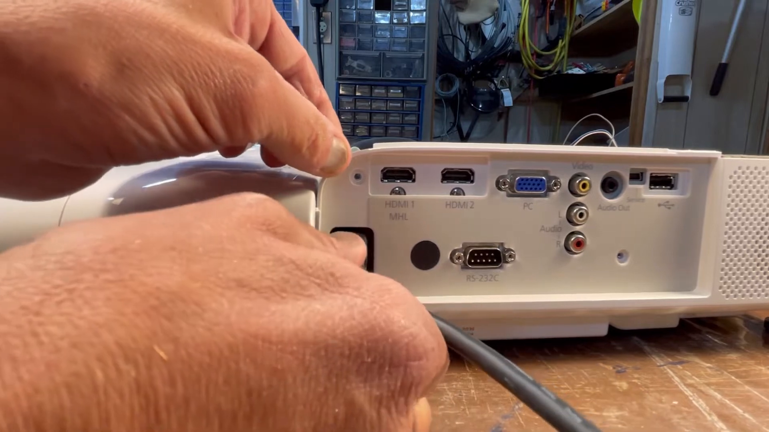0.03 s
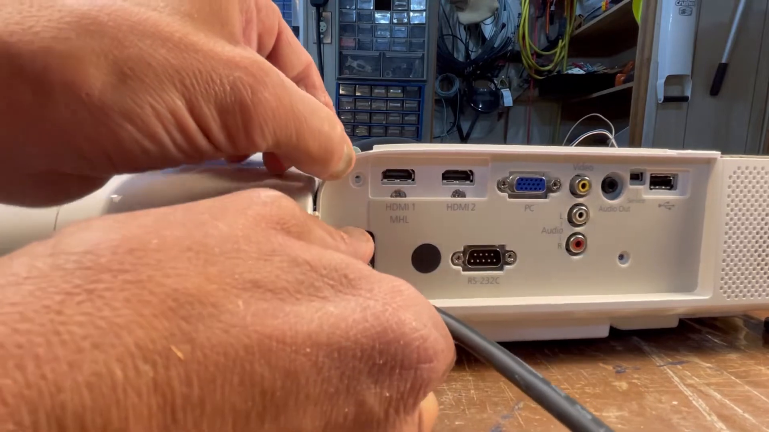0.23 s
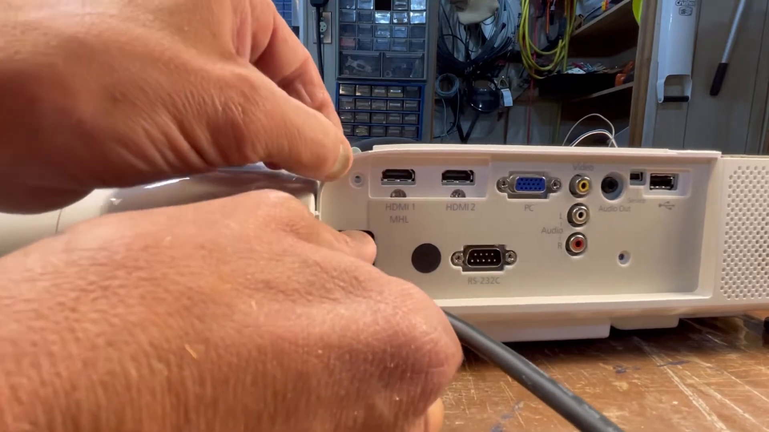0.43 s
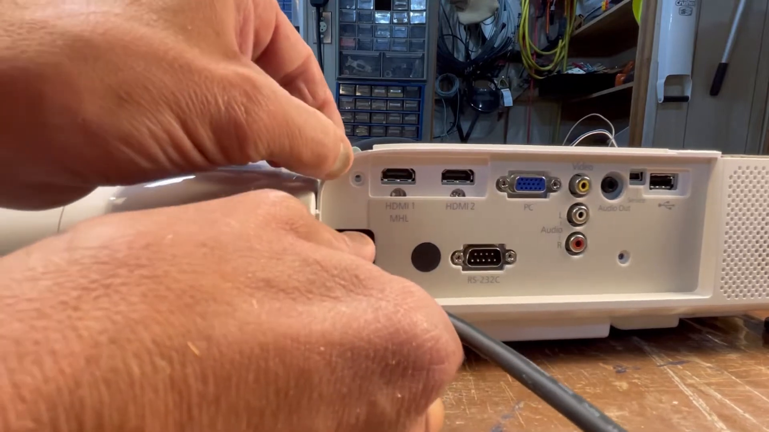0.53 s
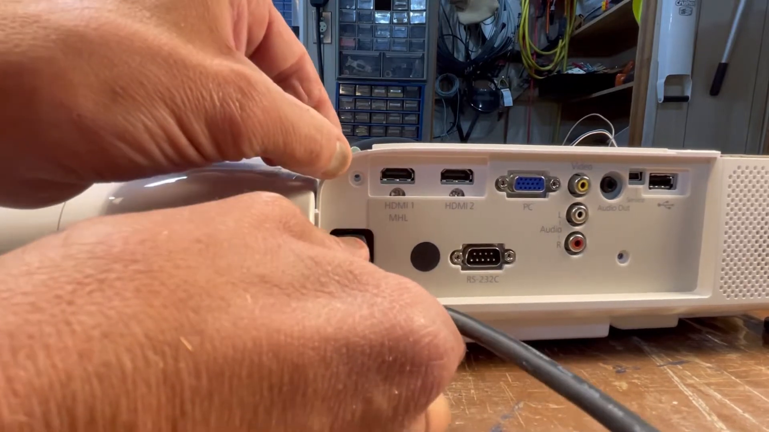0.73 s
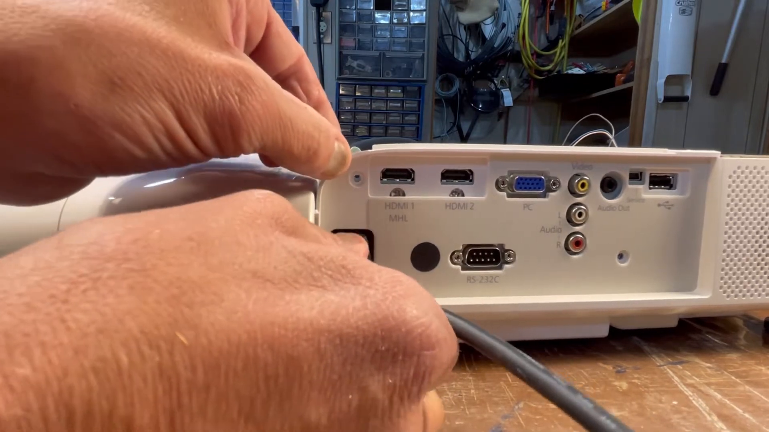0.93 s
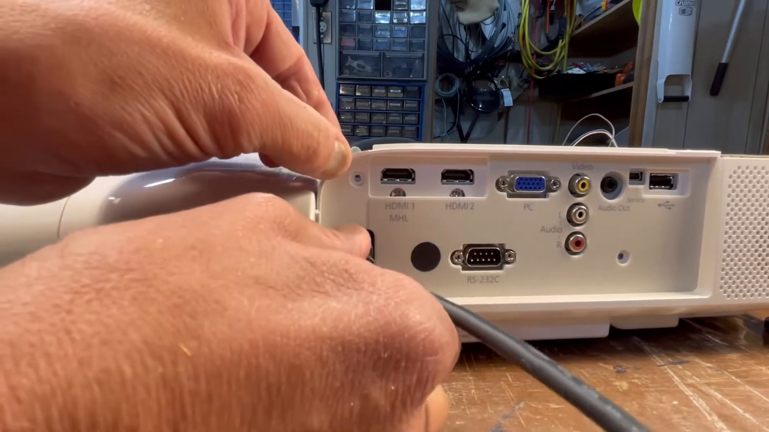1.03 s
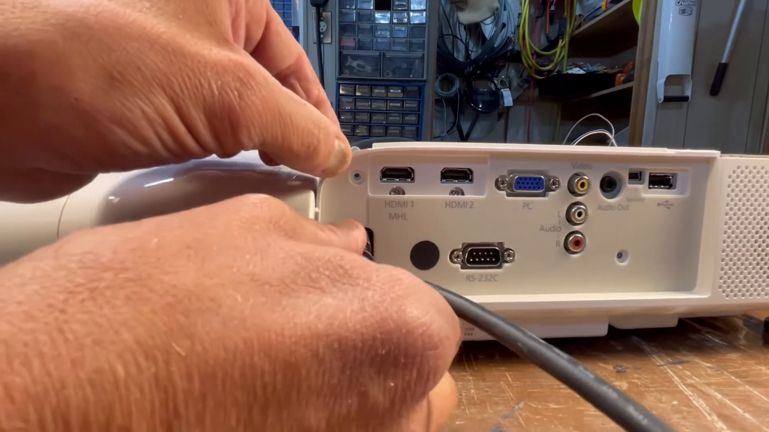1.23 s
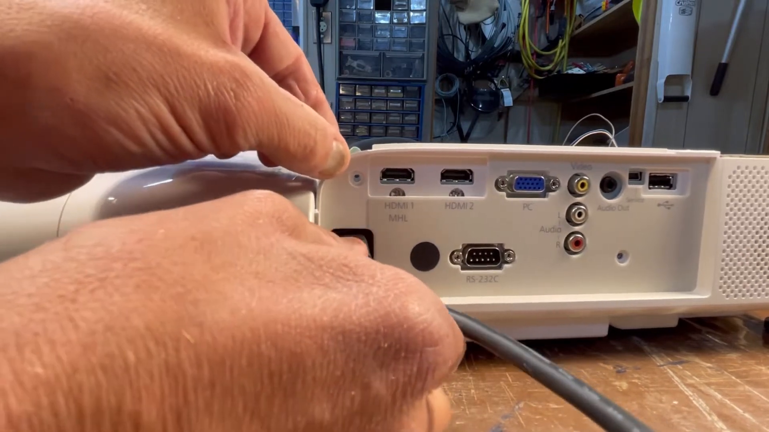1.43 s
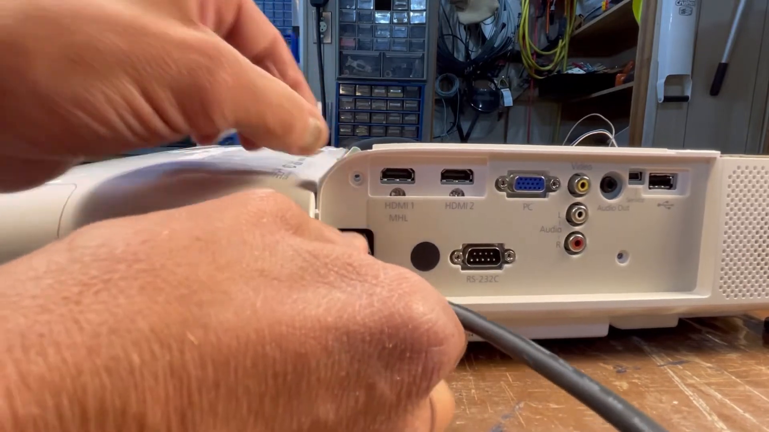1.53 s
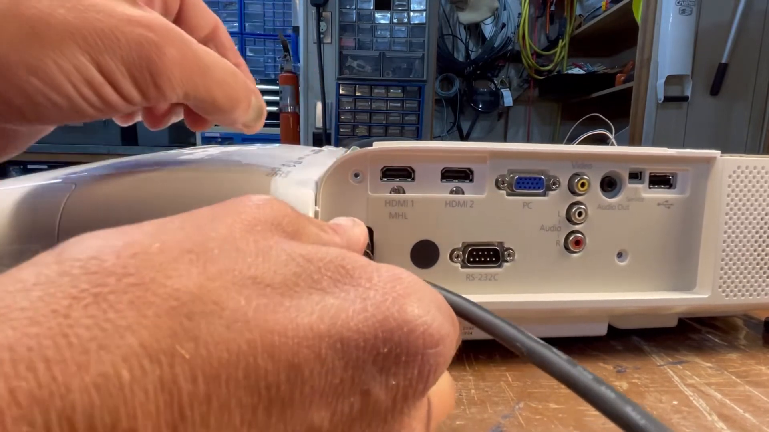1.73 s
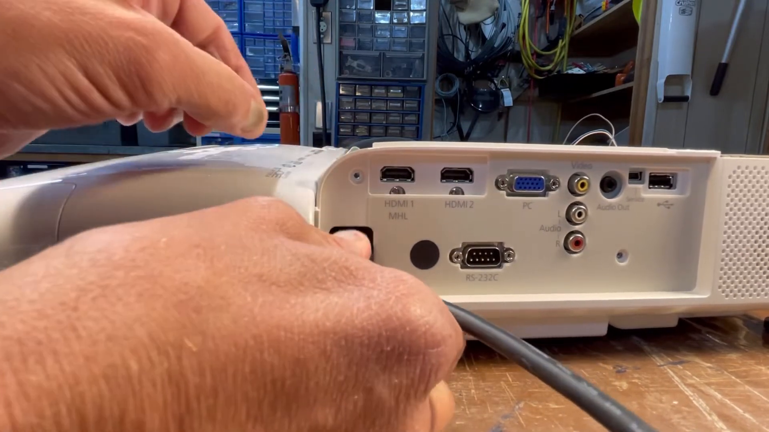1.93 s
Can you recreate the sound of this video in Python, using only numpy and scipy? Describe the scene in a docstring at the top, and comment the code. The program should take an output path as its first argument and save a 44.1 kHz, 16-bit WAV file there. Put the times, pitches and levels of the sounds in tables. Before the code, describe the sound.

A power plug snaps into a hollow plastic projector with one loud, sharp click, then hands wiggle it with faint creaks, rubs and small knocks on a wooden workshop bench; close stereo microphones, light room echo.

```python
"""One sharp click, with smaller knocks, ticks, rubs and faint whistles: a power plug is worked into the
socket of a hollow plastic case on a wooden bench in a workshop, and hands wiggle it after it snaps home.
Knocks are short chatters that ring the modes of case and bench; random grains make the creaks, rubs and
rumble; shaped noise makes squeak and air. The room answers; two spaced microphones listen from close by."""
import sys
import numpy as np
from scipy import signal
from scipy.fft import rfft, irfft
from scipy.io import wavfile
from scipy.ndimage import uniform_filter1d

SR = 44100
rng = np.random.default_rng(int(sys.argv[2]) if len(sys.argv) > 2 else 0)


def dump(signal):
    """Clip the signal to [-1, 1] and save it as 16-bit WAV at the path in sys.argv[1]."""
    limited = np.clip(np.atleast_2d(signal).T, -1, 1)
    pcm = np.round(limited * 32767).astype(np.int16)
    wavfile.write(sys.argv[1], SR, pcm)


def volts_from_db(level):
    """Convert decibel levels to linear amplitude ratios."""
    exponent = np.asarray(level, float) / 20
    return 10 ** exponent


N = 88200   # samples: two seconds

# Every knock of plug on socket; each path adds its own gain to its level:
# (time [s], case ring level [dB], pitch centre [Hz], bright tick level [dB], bench thump level [dB],
#  contact length before limiting [s])
KNOCKS = [(0.2089, -46, 680, -72.5, -72, 0.0022), (0.234, -11, 640, -21, -39.5, 0.0041),
          (0.236, -12.5, 820, -18, -22, 0.0016), (0.24, -11, 1300, -29.5, -37, 0.0035),
          (0.249, -19.5, 700, -39, -36.5, 0.006), (0.323, -35, 450, -62, -40.5, 0.0072),
          (0.48, -39, 780, -55, -45.5, 0.0013), (0.484, -38, 493.6, -54, -41, 0.0042),
          (0.542, -44.5, 995, -83, -55, 0.0021), (0.639, -43, 1071, -61.5, -59, 0.0032),
          (0.658, -50, 1150, -80, -65, 0.0034), (0.675, -50.5, 1130, -76, -62, 0.0047),
          (0.744, -51.5, 999, -84, -59, 0.0029), (0.986, -49, 625, -87, -58.5, 0.0019),
          (1.046, -56.5, 652, -67.5, -60, 0.0054), (1.052, -38.5, 762, -81, -51.5, 0.009),
          (1.0844, -33, 592.6, -70, -61.5, 0.0026), (1.112, -42.5, 960, -60.5, -46.5, 0.0036),
          (1.124, -45, 584, -56, -49.5, 0.0023), (1.136, -39, 900, -64, -75, 0.0023),
          (1.143, -36.5, 1328, -59, -60, 0.00052), (1.311, -57, 460, -65.5, -60.5, 0.0022),
          (1.346, -68, 1276, -84, -67, 0.0024), (1.372, -60.5, 1253, -75.5, -70.5, 0.0024),
          (1.501, -38, 781, -54, -60.5, 0.0028), (1.513, -43.5, 624, -82, -59, 0.0046),
          (1.546, -50.5, 1150, -67.5, -55.5, 0.0082), (1.573, -43, 657, -89, -81, 0.0062),
          (1.597, -35, 1845, -67, -55.5, 0.0039), (1.6061, -24.5, 1010, -45.5, -51, 0.0021),
          (1.613, -32.5, 1320, -64, -58, 0.00193), (1.623, -36.5, 990, -81, -56, 0.0025),
          (1.64, -27.5, 1300, -45, -50.5, 0.00064), (1.781, -44, 506, -90, -55.5, 0.0061),
          (1.848, -62, 516, -73, -71, 0.0048), (1.957, -51.5, 569, -68, -74.5, 0.0057),
          (1.978, -46, 747, -73, -64.5, 0.0024)]
# Hands working the plug, one list per stretch of time:
# (time [s], creak level in the case [dB], rumble level in the bench [dB])
HANDS = [
    [(0, -71.5, -76), (.04, -82.5, -69.5), (.172, -85, -80), (.19, -68.5, -66), (.215, -58.5, -67),
     (.233, -34.5, -35)],
    [(.28, -85, -40.5), (.376, -48, -47.5), (.45, -59, -60), (.504, -56, -45), (.6, -72.5, -65),
     (.7, -72, -60), (.82, -88, -71.5), (.88, -82, -81.5), (.94, -82.5, -76.5)],
    [(.94, -80.5, -74.5), (1.044, -81, -65), (1.064, -65, -51.5), (1.096, -62.5, -61),
     (1.152, -61.5, -58.5), (1.258, -68.5, -72.5), (1.284, -70.5, -59.5), (1.384, -75.5, -73),
     (1.41, -77, -83)],
    [(1.41, -88.5, -89.5), (1.436, -67.5, -66), (1.546, -62.5, -70), (1.58, -63.5, -64),
     (1.622, -48, -56.5), (1.732, -71.5, -59.5), (1.772, -72, -59.5), (1.874, -84, -75.5),
     (1.9, -89, -87.5), (2, -67.5, -99)],
]
LEFT_LAG = round(.062 / 343 * SR)   # samples; the left microphone is 0.062 m farther from the contact
LEAD_S = .003   # a contact builds up just before its knock is heard
ALIKE_BELOW_HZ = 840   # creak and air share their bass between the microphones


def rms_one(x):
    """Scales a sound to an rms of 1."""
    return x / np.sqrt(np.mean(x ** 2) + 1e-20)


def at_hz(points, hz):
    """Reads a curve over frequency, straight between points on a logarithmic frequency scale."""
    points = np.array(points)
    return np.interp(np.log(hz + 1), np.log(points[:, 0]), points[:, 1])


def colour(x, spectrum):
    """Causal filter with the shape of the given spectrum and unit energy."""
    cepstrum = irfft(at_hz(spectrum, np.arange(1025) * SR / 2048) * np.log(10) / 20)
    # folding the cepstrum puts the whole response after time zero
    cepstrum[1:1024] *= 2
    cepstrum[1025:] = 0
    pulse = irfft(np.exp(rfft(cepstrum)))
    pulse = pulse / np.sqrt(np.sum(pulse ** 2))
    pulse = np.reshape(pulse, (1,) * (x.ndim - 1) + (-1,))
    return signal.fftconvolve(x, pulse)[..., :N]


def ring(force, hz, t60):
    """A damped resonance: a unit click sets a sine of about height 1 ringing."""
    r = volts_from_db(-60 / (t60 * SR))
    w = 2 * np.pi * hz / SR
    return signal.lfilter([0, np.sin(w)], [1, -2 * r * np.cos(w), r * r], force + 1e-18)


def grains(per_s, shape):
    """Random clicks of uneven size and sign; rms 1."""
    spread_db = 3.5
    sizes = volts_from_db(spread_db * np.minimum(rng.exponential(1, shape), 4)) * rng.choice([-1, 1], shape)
    return rms_one(sizes * (rng.random(shape) < per_s / SR))


def alike_below(pair, hz):
    """Two noises that share their bass."""
    low = signal.sosfilt(signal.butter(2, hz, fs=SR, output="sos"), pair)
    return pair - low + low[0]


def while_on(curves, column=1):
    """Gain from level curves; each curve sits at -120 dB outside its own time span."""
    t, gain = np.arange(N) / SR, 0
    for rows in curves:
        columns = np.transpose(rows)
        gain = gain + volts_from_db(np.interp(t, columns[0], columns[column], left=-120, right=-120))
    return gain


def contacts():
    """Each knock is a quick dying chatter of tiny contacts, even in colour."""
    t = np.arange(1024) / SR
    length = np.clip(np.array(KNOCKS)[:, 5:6], .0004, .007)
    shape = (1 - np.exp(-t / .00025)) * np.exp(-t / length)
    content = rfft(np.roll(rng.laplace(size=shape.shape) * shape, 40, axis=1))
    even = irfft(content / (uniform_filter1d(np.abs(content), size=15) + 1e-9))
    energy_root = np.sqrt(np.sum(shape ** 2, axis=1, keepdims=True))
    return even * (t < .018) * energy_root


def contact_lean():
    """How far left the contact sits at each knock, in dB before lay() weights each side."""
    # Sideways place of the contact over time: (time [s], lean to the left before weighting [dB])
    lean_curve = [(0, .6), (.3, .8), (.65, 1), (.75, 2.5), (1.1, 1.8), (1.35, 2), (1.6, .4), (1.65, 1.4),
                  (2, 1.5)]
    return np.interp(np.array(KNOCKS)[:, 0], *np.transpose(lean_curve))


def lay(shapes, db, left_db, delay_s):
    """One force shape per knock, at its time and level; the left microphone hears it later."""
    s, out = np.array(KNOCKS)[:, 0], np.zeros((2, N + SR))
    # a lean to the left raises the left side a little less than it lowers the right
    for side, (weight, lag) in enumerate([(0.99, LEFT_LAG), (-1.6, 0)]):
        first = ((s + delay_s) * SR).astype(int) + lag
        at = first[:, None] + np.arange(shapes.shape[1])
        np.add.at(out[side], at, shapes * volts_from_db(db + weight * left_db)[:, None])
    return out[:, :N]


def body(modes, shapes, db, left_db, rubbing, delay_s):
    """Knocks strike each mode with its own strength (db: knocks x modes); hands excite it all along."""
    strength_spread_db, favour_spread_db = 2, 2
    held_share = .3   # modes ring this much shorter under the hands' rubbing
    walls_apart_m = .09   # each mode sounds from its own part of the body, nearer one microphone
    hits, hum, content = 0, 0, np.abs(rfft(shapes, 4096))
    db = db + strength_spread_db * rng.standard_normal(db.shape)
    for k, (hz, level_db, t60) in enumerate(modes):
        tilt_db = favour_spread_db * rng.standard_normal() * np.array([[.5], [-.5]])
        favour = (-1) ** k * volts_from_db(level_db + tilt_db)
        # even out how much of each chatter falls on this mode
        share = content[:, [int(hz / SR * 4096)]] + .3 * content.mean(axis=1, keepdims=True)
        left, right = ring(lay(shapes / share, db[:, k], left_db, delay_s), hz, t60)
        apart = int(rng.uniform(-1, 1) * walls_apart_m / 343 * SR)
        hits = hits + favour * np.array([np.roll(left, apart), right])
        hum = hum + favour * ring(rubbing, hz, held_share * t60)
    return hits, rms_one(hum)


def case_sound(chatter, left_db):
    """Knocks ring the modes of the hollow case; random grains from the hands make it creak."""
    # Modes of the case: (frequency [Hz], level before random spread [dB], free ring time t60 [s])
    shell_modes = [(303, -0.5, 0.036), (381.7, -8.5, 0.055), (465.2, -1.5, 0.04), (561, -6, 0.046),
                   (598, -6, 0.034), (792, 1.5, 0.023), (869.4, -0.5, 0.029), (965, -1.5, 0.032),
                   (1112, -4, 0.04), (1257, -6, 0.035), (1423, -5.5, 0.051), (1710, -2.5, 0.017),
                   (1941, -3.5, 0.027), (2295, -6, 0.016), (2880, -3.5, 0.027), (2895, -2, 0.012),
                   (3220, -6.5, 0.02), (3920, -9.5, 0.0064)]
    gain_db, creaks_per_s = -3, 540
    # a faint knock rings near its own pitch; harder ones wake more modes
    faint_knock_db = -45
    off_pitch_db = 14   # loss one octave off pitch for a faint knock; grows with the square
    _, case_db, centre_hz, _, _, _ = np.transpose(KNOCKS)
    octaves = np.log2(np.array(shell_modes)[:, 0] / centre_hz[:, None])
    off_pitch = octaves ** 2 * (case_db / faint_knock_db)[:, None]
    strength_db = (case_db + gain_db)[:, None] - off_pitch_db * off_pitch
    rubbing = alike_below(grains(creaks_per_s, (2, N)), ALIKE_BELOW_HZ)
    knocks, creak = body(shell_modes, chatter, strength_db, left_db, rubbing, -LEAD_S)
    return knocks + while_on(HANDS) * creak


def ticks(chatter, left_db):
    """The bright click of each contact: its chatter filtered to one fixed colour."""
    # Colour of the ticks: (frequency [Hz], relative level [dB per Hz])
    tick_spectrum = [(880, -24.5), (1500, 1.5), (3490, -9.5), (4580, -11), (8350, -14.5), (9030, -12),
                     (10100, -31.5), (11100, -10.5), (12000, -28), (15700, -51), (22000, -120)]
    gain_db = 10
    tick_db = np.array(KNOCKS)[:, 3]
    return colour(lay(chatter, tick_db + gain_db, left_db, -LEAD_S), tick_spectrum)


def bench_thump():
    """Knocks, as single clicks, set the low modes of the wooden bench ringing."""
    # Modes of the bench: (frequency [Hz], level before random spread [dB], ring time t60 [s])
    bench_modes = [(52, -10.5, .2), (73.85, -8, 0.32), (113.5, 2, 0.094), (151, -9, 0.26), (191, -4, 0.084)]
    gain_db, lean_db, delay_s = 1.5, 1, 0.0055   # lean to the left before weighting
    bench_db = np.array(KNOCKS)[:, 4]
    strength_db = (bench_db + gain_db)[:, None] + np.zeros(len(bench_modes))
    clicks = np.ones((len(KNOCKS), 1))
    thump, _ = body(bench_modes, clicks, strength_db, lean_db, np.zeros(N), delay_s)
    return thump


def rubs():
    """Plastic slips on plastic: dense random grains, filtered and faded in and out."""
    # Strength of each rub, one list per rub: (time [s], level [dB])
    rub_curves = [
        [(0.15, -78.5), (0.224, -54.5), (0.229, -41.5), (0.234, -23)],
        [(1.0, -89), (1.004, -73), (1.052, -62), (1.068, -72.5), (1.075, -84)],
        [(1.15, -66), (1.154, -88), (1.204, -95), (1.23, -80), (1.376, -79), (1.41, -101)],
        [(1.42, -97), (1.49, -48), (1.5, -46), (1.52, -72), (1.54, -85)],
        [(1.54, -76), (1.55, -63.5), (1.584, -75), (1.606, -63.5), (1.626, -70), (1.72, -77.5)],
        [(1.83, -96), (1.854, -69), (1.862, -81), (1.912, -83), (1.968, -73), (2.0, -76)],
    ]
    # Colour of the rubs: (frequency [Hz], relative level [dB per Hz])
    rub_spectrum = [(410, -30.5), (700, -3), (1250, -3.5), (1400, -23), (1710, -6.5), (2960, -15.5),
                    (3140, -9.5), (10100, -11), (10900, -10), (12000, -23), (15700, -50), (22000, -120)]
    slips_per_s = 3500
    alike = 0.1   # weight of the grains that both microphones have in common
    common = grains(slips_per_s, N)
    common = np.array([np.roll(common, LEFT_LAG), common])
    slips = alike * common + (1 - alike) * grains(slips_per_s, (2, N))
    return while_on(rub_curves) * rms_one(colour(slips, rub_spectrum))


def hand_rumble():
    """Hands push on the bench: random grains filtered to a deep rumble."""
    # Colour of the rumble: (frequency [Hz], relative level [dB per Hz])
    rumble_spectrum = [(25, -9), (45, -1), (75, 3), (115, -6.5), (170, -9), (300, -19), (700, -48),
                       (3000, -89.5)]
    pushes_per_s = 340
    return while_on(HANDS, column=2) * rms_one(colour(grains(pushes_per_s, N), rumble_spectrum))


def squeak():
    """Breathy squeak of the plug: noise through one narrow resonance."""
    # Strength of the squeak: (time [s], level [dB])
    squeak_curve = [(1.15, -95), (1.176, -71.5), (1.202, -69), (1.26, -82), (1.28, -83.5)]
    pitch_hz, width_hz = 5830, 700
    breath = ring(rng.standard_normal(N), pitch_hz, 2.2 / width_hz)   # a wider band rings shorter
    return while_on([squeak_curve]) * rms_one(breath)


def whistles():
    """Short wavering tones that swell, glide in pitch and fade."""
    # Faint gliding whistles:
    # (start [s], length [s], first pitch [Hz], last pitch [Hz], level before swell and waver [dB])
    glides = [(1.68, .19, 1800, 1620, -78.5), (1.7, .075, 4500, 4350, -85.5),
              (1.752, 0.032, 4990, 4910, -83.5), (1.947, .05, 3940, 3906, -79),
              (1.97, 0.032, 4440, 4500, -87)]
    out, t = 0, np.arange(N) / SR
    for s, length, first_hz, last_hz, db in glides:
        part = np.clip((t - s) / length, 0, 1)
        waver = 1 + 0.33 * rms_one(uniform_filter1d(rng.standard_normal(N), size=400))
        pitch_hz = first_hz + (last_hz - first_hz) * part
        tone = np.sin(2 * np.pi * np.cumsum(pitch_hz) / SR)
        out = out + volts_from_db(db) * waver * np.sin(np.pi * part) * tone
    return out


def room(x):
    """Dense echoes, made of noise bands that each die at their own rate."""
    # Time the echoes take to die by 60 dB: (frequency [Hz], time [s])
    die_away = [(60, 0.31), (250, 0.71), (1000, 0.53), (4000, 0.54), (10000, 0.14)]
    # Colour of the echoes: (frequency [Hz], relative level [dB])
    echo_spectrum = [(60, -1.84), (350, 2), (700, 0.5), (1300, -0.5), (2000, -2.5), (3200, -2), (6000, 0.5),
                     (12000, -1)]
    gap_s, room_alike_below_hz = 0.00072, 660   # the echoes build up over the gap
    t, band_edges, echo = np.arange(SR) / SR, 30 * 2. ** np.arange(10), 0
    white = alike_below(rng.standard_normal((2, 2, SR)), room_alike_below_hz)
    for k, (low, high) in enumerate(zip(band_edges, band_edges[1:])):
        octave = signal.butter(2, [low, high], "band", fs=SR, output="sos")
        band = signal.sosfilt(octave, white[:, k % 2])   # neighbouring bands get separate noises
        echo = echo + band * volts_from_db(-60 * t / at_hz(die_away, np.sqrt(low * high)))
    echo = colour(echo, echo_spectrum)[:, :SR] * (1 - np.exp(-(t / gap_s) ** 2))
    echo = echo / np.sqrt(np.sum(echo ** 2) / 2)
    return signal.fftconvolve(x[:1], echo)[:, :N]   # the left channel feeds both sides


def steady_air():
    """Steady background air: filtered noise whose bass is alike in both microphones."""
    # Colour of the air: (frequency [Hz], relative level [dB per Hz])
    air_spectrum = [(15, -36), (25, 0.5), (109, -12), (358, -12), (440, -16), (585, -17.5), (1780, -34),
                    (8830, -32), (10300, -44.5), (12000, -39), (15700, -65.5), (22000, -120)]
    air_db = -72.5
    noise = alike_below(rng.standard_normal((2, N)), ALIKE_BELOW_HZ)
    return volts_from_db(air_db) * rms_one(colour(noise, air_spectrum))


def scene():
    """Adds case, plug and bench sounds, the room's answer to them, and the air."""
    room_db, bench_room_db = -19, -13   # how strongly bright and deep sounds reach the room
    chatter, left_db = contacts(), contact_lean()
    bright = case_sound(chatter, left_db) + ticks(chatter, left_db) + rubs() + squeak() + whistles()
    deep = bench_thump() + hand_rumble()
    echoes = room(volts_from_db(room_db) * bright + volts_from_db(bench_room_db) * deep)
    return bright + deep + echoes + steady_air()


def band_limit(x):
    """A steep low-pass at the top of the band."""
    return signal.sosfilt(signal.butter(12, 12190, fs=SR, output="sos"), x)


def record(dry):
    """The microphones lose the deepest bass: two equal high-pass filters in a row."""
    cut = signal.butter(2, 40, "high", fs=SR, output="sos")   # each turns over at 40 Hz
    mix = signal.sosfilt(np.vstack([cut, cut]), dry)
    return band_limit(mix)


dry = scene()
out = record(dry)
dump(out)
```